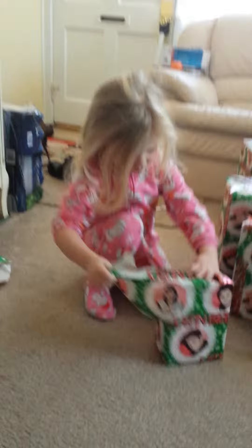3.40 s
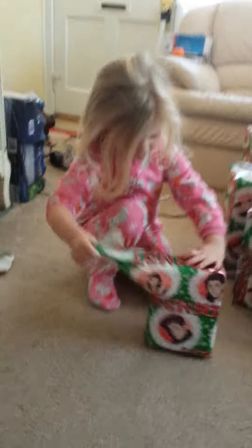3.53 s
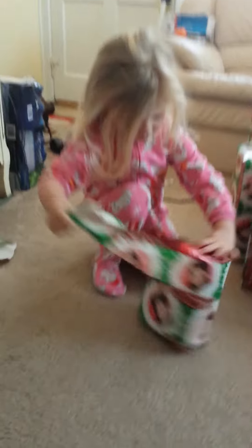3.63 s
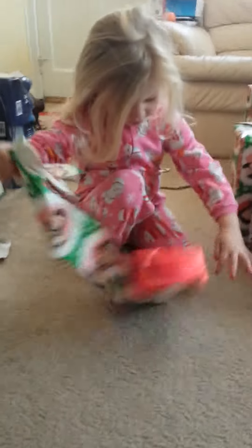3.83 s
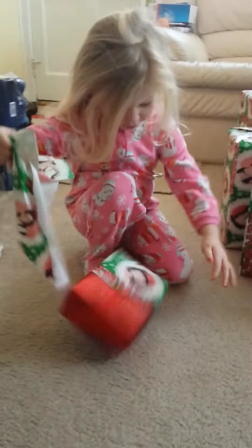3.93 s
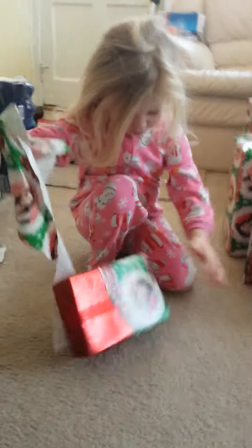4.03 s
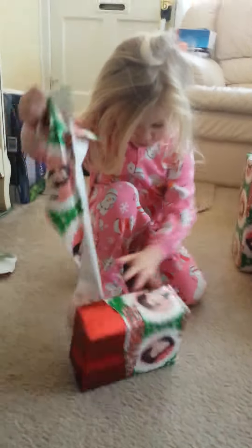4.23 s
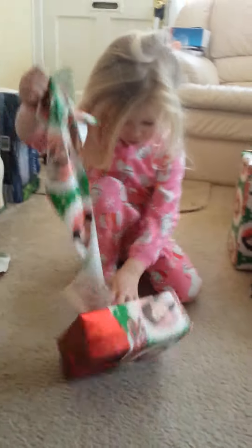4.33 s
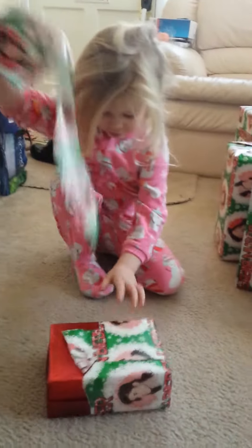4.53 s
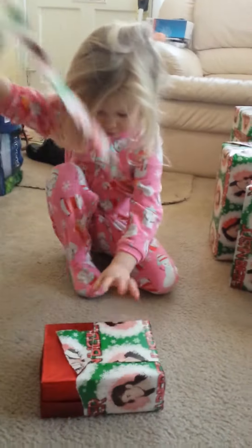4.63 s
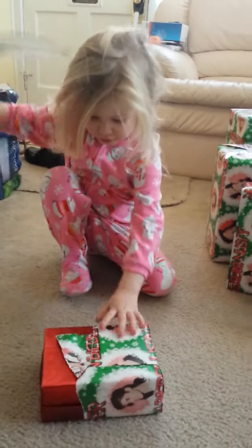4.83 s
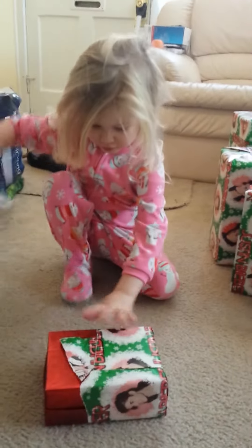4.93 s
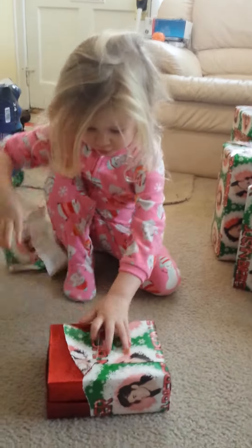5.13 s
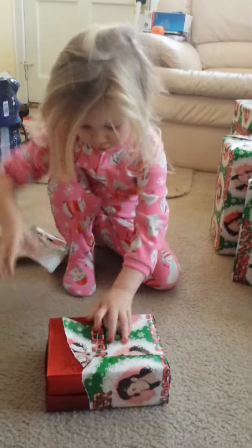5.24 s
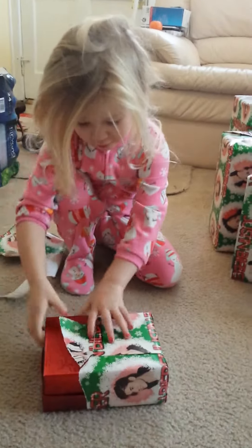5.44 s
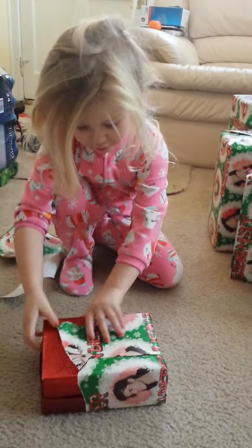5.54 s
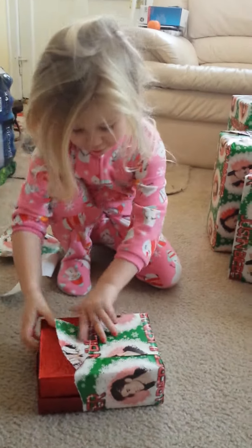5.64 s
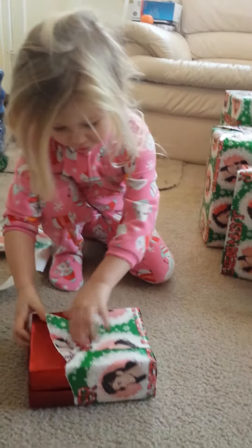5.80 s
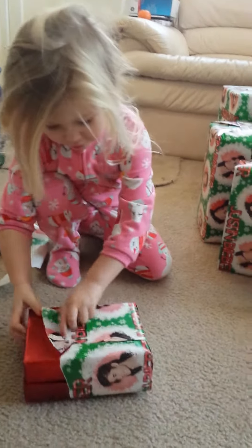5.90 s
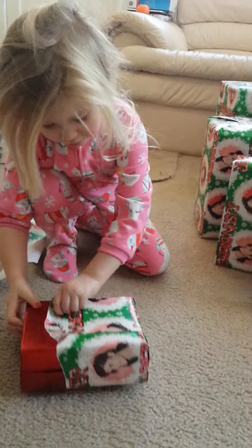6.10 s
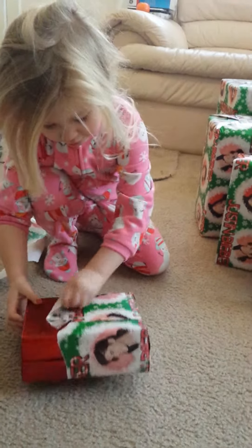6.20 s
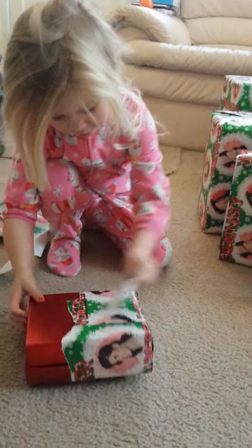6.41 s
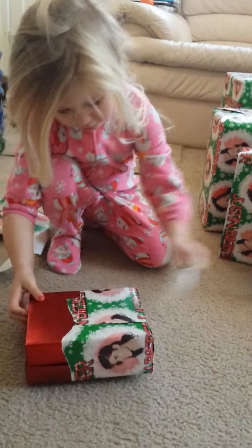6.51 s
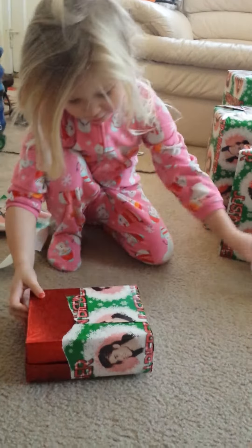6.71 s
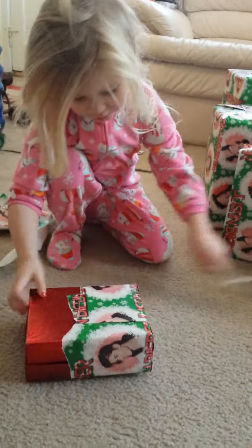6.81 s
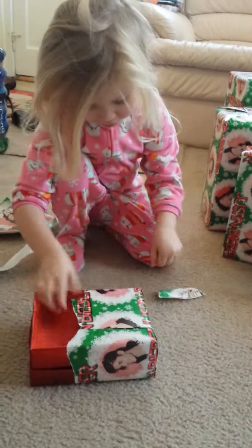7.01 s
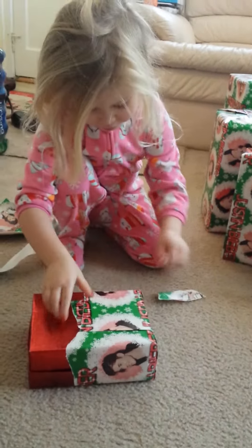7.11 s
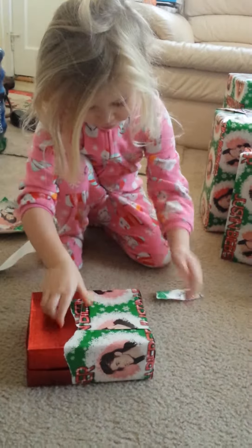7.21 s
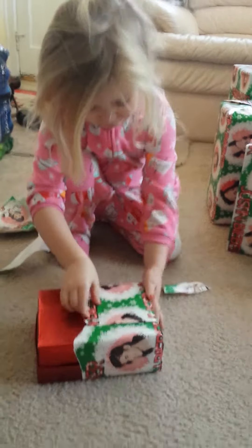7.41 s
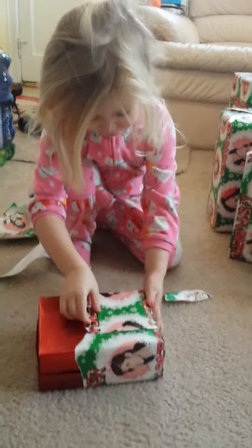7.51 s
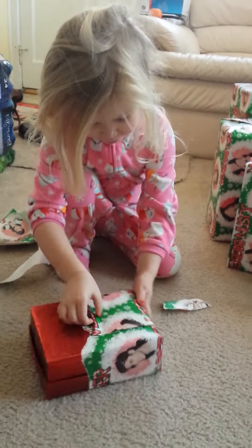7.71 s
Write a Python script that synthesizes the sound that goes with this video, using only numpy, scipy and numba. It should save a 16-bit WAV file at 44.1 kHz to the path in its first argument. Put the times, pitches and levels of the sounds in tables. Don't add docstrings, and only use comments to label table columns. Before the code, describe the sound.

Gift wrap is pulled from a hollow cardboard box on carpet. Dry crackling leads into two strong stretches of uneven ripping, separated by quieter rustling. A low microphone bump lands during the second. After another short rip come soft thuds, finger taps and thin crinkles, a brief lighter tear, then near quiet. Stereo phone sound, close and bright, with short room reverberation, light hiss and faint hum.

```python
import sys
import numpy as np
from scipy import signal
from scipy.fft import rfft, irfft
from scipy.io import wavfile
from scipy.ndimage import uniform_filter1d
from numba import njit

SR = 44100
rng = np.random.default_rng(int(sys.argv[2]) if len(sys.argv) > 2 else 0)


def voltage_ratio(level):
    return 10 ** (np.asarray(level, float) / 20)


def inscribe(sig):
    pcm = np.round(np.clip(np.atleast_2d(sig).T, -1, 1) * 32767)
    wavfile.write(sys.argv[1], SR, pcm.astype(np.int16))


N = 342216

# [start t/s, length t/s, level/dB, change over the pull level/dB]
RIPS = [(0.715, 0.2, -29, -11.5), (0.906, 0.13, -35.5, 0.5), (1.054, 0.21, -30.5, 4),
        (1.287, 0.016, -36.5, 8), (1.327, 0.032, -35, 9.5), (1.37, 0.03, -22, -7.5),
        (1.4, 0.016, -17, -10.5), (1.408, 0.068, -30.5, 13), (1.482, 0.18, -14.5, -5),
        (1.865, 0.015, -25.5, -5.5), (1.88, 0.016, -29.5, 13.5), (1.908, 0.13, -27.5, 6.5),
        (2.027, 0.031, -36, 5.5), (2.062, 0.075, -21, -2), (3.051, 0.054, -30.5, -24.5),
        (3.108, 0.017, -35.5, 6), (3.132, 0.062, -32, 7.5), (3.197, 0.031, -20, 5),
        (3.227, 0.17, -19.5, -9), (3.408, 0.012, -16, -6), (3.423, 0.033, -22, 3), (3.469, 0.1, -18, -32.5),
        (3.531, 0.063, -36.5, 9.5), (3.595, 0.023, -27.5, 7), (3.633, 0.11, -17, -17),
        (3.753, 0.043, -27, 4), (3.796, 0.0305, -24.5, 2), (3.822, 0.031, -17.5, 2),
        (3.909, 0.061, -20, 2.5), (4.28, 0.022, -25.5, -11), (4.304, .13, -21.5, -6),
        (4.443, 0.12, -15.5, -7), (5.138, 0.077, -53, 14.5), (6.175, 0.084, -37, -7),
        (6.207, 0.074, -32, -14), (6.285, 0.176, -28, 6.5)]
GRIP_S, LET_GO_DB_PER_S = 0.008, 1795
# [middle t/s, half length t/s, level/dB]
RUSTLES = [(0.03, 0.11, -48.5), (0.234, 0.091, -45), (.38, 0.21, -51.5), (0.522, 0.02, -39.5),
           (0.723, 0.24, -41.5), (1.766, 0.26, -42), (2.19, 0.044, -45), (2.358, 0.08, -46.5),
           (2.477, 0.053, -42), (2.693, 0.17, -52.5), (2.963, 0.12, -46.5), (2.975, 0.016, -40),
           (4.03, 0.096, -42), (4.141, 0.0026, -27.5), (4.193, 0.51, -51), (4.913, 0.12, -51),
           (5.042, 0.1, -44), (5.238, 0.066, -45.5), (5.473, 0.17, -50.5), (5.876, 0.12, -60.5),
           (5.652, 0.072, -49.5), (5.98, 0.035, -47), (6.148, 0.049, -44.5), (6.793, 0.019, -55.5),
           (6.933, 0.046, -54), (7.144, 0.0092, -54), (7.196, 0.02, -60.5), (4.583, 0.058, -36),
           (7.499, 0.024, -40.5), (7.59, 0.018, -65), (7.73, 0.091, -46)]
# [t/s, slackness level/dB, contact with the box level/dB, left-right level/dB]
SHEET = [(0, -14, -10, 6), (.7, -9, -9.5, 8), (1.2, -2.5, -12, 7.5), (1.57, -5, -19.5, 6.5),
         (2.0, -6.5, -15, 8.5), (2.6, -9, -3, 10), (3.25, -6.5, -13, 8.5), (3.45, -8.5, -14, 6.5),
         (3.7, -11, -13, 9.5), (3.85, -9.5, -20.5, 5), (4.35, -7, -18.5, 10), (4.55, -13, -16.5, 4.5),
         (5.1, -8, -12.5, 7.5), (6.0, -12, 0.5, 5), (6.26, -14, -15, 12), (6.42, -13.5, -10, 5.5),
         (7.4, -12, 0.5, 11.5), (7.76, -13, -11, 4)]

# [f/Hz, level/dB per Hz]
FIBRE = [(880, -57.5), (1500, -10.5), (1620, -11), (3030, -9.5), (5090, -4), (5560, -3.5), (6630, 0),
         (7910, -1.5), (13900, -13), (14900, -31), (15500, -51)]
# [f/Hz, level/dB per Hz]
FLEX = [(300, -24), (600, -3), (1000, 4), (1500, 3), (2500, 5.5), (4500, -5.5)]
# [f/Hz, level/dB per Hz]
DRUM = [(90, -23), (190, 3), (300, -10), (440, -4), (600, -9), (1000, -18.5)]
SLIDE_DB, CRINKLE_DB = 1.5, -8
FLEX_PER_DB, DRUM_PER_DB, EFFORT_DB = -0.42, -0.2041, -31
STILL_DB = -51
RUN_DB, RUN_SHARE = -25.5, 0.44
SLACK_HZ, SLACK_SHARE, SLACK_DB = 4000, 0.13, -9
PATCHY_DB = 2.5

# [t/s, peak level/dB, centre f/Hz]
POPS = [(0.139, -20, 8140), (0.2732, -21, 6470), (0.5616, -12, 5160), (0.7135, 1, 2100),
        (0.748, -20, 6700), (0.7761, -26, 6910), (0.7956, -29, 6190), (0.84, -22, 4750),
        (0.8525, -10, 8000), (0.904, -18, 5980), (0.9203, -7.5, 4230), (0.9193, -23, 5660),
        (0.9729, -2.5, 6600), (1.051, -6, 6360), (1.059, -12, 6260), (1.0848, -4, 6610),
        (1.118, -6.5, 4230), (1.124, -16, 5560), (1.176, -13, 6770), (1.189, -14.5, 5070),
        (1.209, -3.5, 5400), (1.242, -3.5, 6290), (1.287, -25, 6330), (1.2955, -30, 6340),
        (1.3385, -27, 8900), (1.341, -11, 4760), (1.37, -6.5, 8180), (1.402, -2.5, 8700),
        (1.438, -25.5, 6400), (1.4567, -11, 5910),
        (1.7597, -19, 6100), (1.8415, -20, 6620), (1.866, -6, 8200), (1.8935, -1, 6890),
               (2.0605, -0.5, 6380), (2.1807, -17, 7260), (2.2167, -21.5, 6520), (2.3, -28, 6870),
               (2.3254, -24.5, 3650), (2.5748, -28.5, 6410), (2.7415, -25.5, 3900), (2.7659, -25, 6530),
               (2.9704, -17, 5860), (3.0557, -21, 6600), (3.1166, -28, 6630), (3.1435, -25, 6640),
               (3.184, -26, 6660), (3.184, -2, 6680), (3.4089, -9, 8000), (3.4324, -28.5, 7090),
               (3.4753, -4, 7000), (3.5541, -6, 7200), (3.604, 1, 5090), (3.6324, 0, 6500),
               (3.6893, -22, 8060),
        (3.6894, 3, 8000), (3.755, -10, 5920), (3.767, -16, 8910), (3.802, -0.5, 8000),
              (3.831, 1, 6340), (3.9116, -3, 6500), (4.0505, -15, 4020), (4.102, -32, 3740),
              (4.1425, -29.5, 6640), (4.2433, -27.5, 6060), (4.2835, -20, 5200), (4.306, -9, 4830),
              (4.388, -7, 6550), (4.447, -21, 6300), (4.8968, -33, 2770), (4.8956, -21.5, 5170),
              (4.9806, -27, 6580), (5.0046, -13.5, 6660), (5.0518, -33, 6690), (5.0622, -24.5, 4800),
              (5.0795, -16, 6540), (5.15, -31, 9650), (5.1524, -10.5, 10800), (5.174, -23, 10300),
              (5.1944, -25, 6750), (5.952, -47, 6050),
        (6.0536, -19, 6500), (6.093, -20, 7800), (6.146, -39, 8650), (6.147, -14, 8650),
             (6.1761, -5, 7100), (6.2104, -12, 6630), (6.2198, -19, 7310), (6.239, -16, 6940),
             (6.2584, -5, 6730), (6.2734, -4.5, 7450), (6.298, -5, 6750), (6.314, -12, 6800),
             (6.339, -6.5, 6690), (6.362, -6, 7610), (6.3865, -1, 7330), (6.7208, -34.5, 2070),
             (6.8618, -36.5, 4430), (6.957, -33, 7100), (7.1387, -42, 8300), (7.4345, -45, 6350),
             (7.467, -39, 6200), (7.466, -30, 6300), (7.483, -24, 6320), (7.5131, -21.5, 6300),
             (7.6211, -24.5, 6940), (7.667, -23, 9050), (7.709, -21.5, 7000)]
# [t/s, peak level/dB, centre f/Hz]
TICKS = [(0.0763, -32, 7100), (0.08, -24.5, 6300), (0.1472, -27, 8400), (0.1538, -28, 7800),
         (0.1759, -30, 7600), (0.2329, -29, 5900), (0.375, -28.5, 4380), (0.4276, -34, 6900),
         (0.4472, -35, 6000), (0.4996, -28, 7100), (0.6504, -23, 2980), (0.6763, -21, 8300),
         (0.69, -20, 4300), (0.767, -28, 8700), (0.776, -25, 5800), (0.915, -27, 7200),
         (0.999, -9, 5900), (1.0347, -17, 6300), (1.1272, -2.5, 4100), (1.1764, -23, 6600),
         (1.19, -10, 8200), (1.2003, -6, 7900), (1.215, -6, 9000), (1.2746, -16, 6500),
         (1.288, -16, 6500), (1.2973, -22, 6400), (1.3228, -20, 5500), (1.3471, -23, 5200),
         (1.377, -16, 8500), (1.7675, -18.5, 5100), (1.8235, -22, 4900), (1.857, -10, 9200),
         (1.9163, -4, 7100), (2.1887, -17, 6900), (2.3224, -33, 6300), (2.3635, -26, 5900),
         (2.3972, -34, 7400), (2.9024, -30, 9500), (2.977, -25, 6300), (3.0068, -28, 6300),
         (3.0558, -20, 6600), (3.1102, -27, 3720), (3.2921, -7, 6300), (3.337, -6, 7500),
         (3.3658, -4, 7640), (3.3695, -4, 6300), (3.394, -14, 7800), (3.4392, 1.5, 7100),
         (3.5187, -13, 6200), (3.5432, -16, 7500),
         (3.559, -10, 9200), (3.5687, -11, 6500), (3.6713, 3.5, 6200), (3.7081, -0.5, 6450),
              (3.7148, -6, 5200), (3.771, -4.5, 4570), (3.7876, -9, 8700), (3.814, -9.5, 5900),
              (3.8517, -11, 6700), (3.8835, -9, 5900), (3.9004, -14, 8400), (3.9619, -3, 6900),
              (3.9894, -15, 7100), (3.999, -13, 9400), (4.102, -44, 6100), (4.2871, -14, 7200),
              (4.2915, -27, 5800), (4.307, -23, 6800), (4.3311, -2.5, 4900), (4.3805, -4.5, 6800),
              (4.7345, -34, 5870), (4.8869, -32, 7500), (4.9199, -35, 8200), (4.9772, -29, 7000),
              (5.022, -24, 6630), (5.0996, -33, 7000), (5.1427, -19, 10900), (5.166, -22, 9600),
              (5.1713, -26, 10300), (5.1964, -25, 9600), (5.3546, -32, 6800), (5.515, -30, 6500),
              (5.9164, -38, 6800), (6.0699, -29, 6900), (6.0739, -34, 10200), (6.09, -15, 7200),
              (6.1605, -37, 7300), (6.221, -12, 6500), (6.2247, -11, 4000), (6.3008, -21, 6700),
              (6.355, -2.5, 6600), (6.4774, -8, 7300), (6.7155, -49, 6250), (6.87, -34.5, 4000),
              (7.0645, -61, 5500), (7.1936, -36, 1820), (7.3419, -39.5, 7500), (7.3809, -48, 6860),
              (7.5814, -42, 8000), (7.5851, -39, 6700), (7.6366, -27, 6200),
         (0.7114, -5, 7500), (3.1182, -14, 4970), (4.4447, -8, 5500), (0.5624, -31, 8000),
              (0.762, -13, 2940), (1.167, -5, 1900), (1.4045, -8, 8500), (1.4695, -14.5, 9000),
              (0.819, -27, 6000), (1.338, -12, 5500), (1.486, -4, 8500), (1.547, -2, 5300),
              (1.872, -8, 8100), (1.982, -5.5, 8000), (3.1425, -8.5, 8000), (5.185, -29, 10500),
              (5.208, -18.5, 4200), (6.192, -14, 7000), (6.2407, -4.5, 2880), (6.2505, -11, 7000),
              (6.466, -4, 9000),
         (1.4895, -3, 8000), (1.5005, -9, 8500), (1.513, 4.5, 6500), (1.6444, -3.5, 7800),
              (1.9652, -5, 8200), (2.0201, -12, 9200), (2.0362, -22, 4950), (3.0691, -40, 6600),
              (3.2535, -10, 3900), (3.2875, -10.5, 6800), (3.311, -2, 6800), (3.3457, -7, 7000),
              (3.412, -6, 6700), (3.6548, 4, 6200), (3.7216, -9, 5900), (3.796, -9.5, 8200),
              (3.837, -6, 9000), (3.9166, -0.5, 9800), (3.9335, -3, 6200), (4.0535, -31, 8100),
              (4.3132, -15, 4800), (4.458, -4, 6500), (4.5464, -5.5, 6500), (6.2257, -15, 7200),
              (6.2375, -15, 6600), (6.27, -8, 6500), (6.3741, -8, 4600), (6.4396, -5, 7700)]
POP_DB, SHIVER_DB = -1.5, -21

# [t/s, peak level/dB, pitch f/Hz, t60 t/s]
KNOCKS = [(0.71, -30, 326, 0.025), (4.603, -28.5, 70.5, 0.029), (4.63, -36, 63.6, 0.072),
          (4.734, -41.5, 151, 0.023), (5.149, -33.5, 414, 0.04), (5.302, -45, 504, 0.041),
          (5.326, -46, 300, 0.12), (5.355, -42, 400, 0.026), (5.515, -38.5, 190, 0.093),
          (5.572, -35.5, 312, 0.06), (5.584, -38, 298, 0.066), (5.968, -34, 285, 0.047),
          (6.18, -29.5, 285, 0.017), (7.129, -41, 288, 0.042), (7.138, -35, 307, 0.058),
          (7.2, -51, 398, 0.05), (7.491, -34, 274, 0.036), (7.62, -41, 265, 0.051)]
# [t/s, peak level/dB, cavity f/Hz, damping as decay rate over angular frequency]
BUMP = (3.6284, 6.9, 62, 1.3)
# [f/Hz, left-right level/dB]
PORTS = [(100, 3), (400, -2), (1500, -2.5), (3300, 0), (5500, 2.5), (7200, 3), (9000, -10.5), (14000, -4.5)]
# [f/Hz, left lead/radians]
LEAD = [(0, 0), (1810, 1), (4820, -0.63), (5340, 1.52), (8100, 0.0), (9910, 5), (15200, 0.5)]
# [f/Hz, likeness -1 to 1]
SAME = [(60, 1), (240, 0.57), (950, 0.96), (3770, 0.18), (15000, 0.19)]

# [f/Hz, t60 t/s]
ROOM = [(150, 0.33), (1000, 0.43), (4000, 0.29), (12000, 0.18)]
# [f/Hz, level/dB per Hz]
AIR = [(15, -16), (25, -17), (43, -11), (140, -10), (199, -10.5), (297, -12.5), (340, -15.5), (1340, -27.5),
       (2930, -32.5), (6390, -27.5), (13900, -30.5), (15500, -72)]
AIR_DB = -55.5
# [f/Hz, likeness -1 to 1]
AIR_SAME = [(60, 0.7), (240, 0.86), (950, 0.13), (3770, 0.055), (15000, 0.019)]
# [f/Hz, rms level/dB]
HUM = [(86.1, -65.5), (118.4, -62.5), (145.3, -61.5), (236.9, -91.5), (290.7, -61), (425.3, -74)]


def tearing():
    s, *columns = np.transpose(SHEET)
    slack_db, drum_db, _ = (np.interp(np.arange(N) / SR, s, c) for c in columns)
    torn, loose = pull(), shifting()
    effort = np.sqrt(torn ** 2 + loose ** 2 + 1e-9)
    over = effort / voltage_ratio(EFFORT_DB)

    fibres = swarm(1500, 3.0, 0.5, 0.0004, 3000, 13000, FIBRE)
    flex = patchy(swarm(550, 1.7, 0.8, 0.0026, 595, 3320, FLEX))
    drum = swarm(300, 0.84, 0.49, 0.0068, 260, 515, DRUM).mean(0)
    slide = patchy(colour(pair(*rng.standard_normal((2, N)), SAME), lambda f: read(FIBRE, f)))

    low = voltage_ratio(slack_db) * over ** FLEX_PER_DB * flex
    low = low + voltage_ratio(drum_db) * over ** DRUM_PER_DB * drum
    run = RUN_SHARE * torn ** 2 / (torn ** 2 + voltage_ratio(RUN_DB) ** 2)
    high = (torn * np.sqrt(1 - run) + voltage_ratio(CRINKLE_DB) * loose) * fibres
    high = high + (torn * np.sqrt(2 * run) + voltage_ratio(SLIDE_DB - 3.5) * loose) * slide
    high = high + creases()
    dull = signal.lfilter(*signal.butter(2, SLACK_HZ, fs=SR), high)
    high = high + (voltage_ratio(SLACK_SHARE * (slack_db - SLACK_DB)) - 1) * dull
    return voltage_ratio(-1.5) * (high + effort ** 2 / (effort + voltage_ratio(STILL_DB)) * low)


def pull():
    age, power = np.arange(SR // 2) / SR, np.zeros(N)
    for s, length, db, change_db in RIPS:
        shape_db = change_db * np.minimum(age / length, 1)
        shape_db = shape_db - LET_GO_DB_PER_S * np.maximum(age - length, 0)
        add(power, s, np.minimum(age / GRIP_S, 1) * voltage_ratio(db + shape_db) ** 2)
    return np.sqrt(power)


def shifting():
    t = np.arange(N) / SR
    return np.sqrt(sum(voltage_ratio(db) ** 2 * np.exp(-((t - s) / half) ** 2) for s, half, db in RUSTLES))


def creases():
    def body(f):
        return 0.78 * read(FIBRE, np.maximum(f, 1600)) - 12.0 * np.log2(1 + 900 / (f + 1))

    out = np.zeros((2, N))
    pops = POPS
    ticks = TICKS
    for s, db, hz in pops + ticks:
        pop = snap(hz, 0.00028, 6 - 0.6 * body(hz), body, 3.5, size=1024)
        pop = pop / abs(pop.mean(0)).max()
        shiver = snap(hz, 0.004, 3 - 0.4 * body(hz), body, 0, size=1024)
        add(out, s + 0.001, voltage_ratio(db + POP_DB) * (pop + voltage_ratio(SHIVER_DB) * shiver))
    return out


def swarm(per_s, spread_db, clump, decay_s, low_hz, high_hz, body, count=60):
    rate = per_s * np.exp(clump * drift(0.004))
    chance, big, which = rng.random((N, 3)).T
    at = np.flatnonzero(chance < rate / SR)
    size = voltage_ratio(spread_db * np.minimum(-np.log(big[at] + 1e-9), 4))
    patch = (which[at] * count).astype(int)
    centres = np.geomspace(low_hz, high_hz, count)
    shapes = np.array([snap(hz, decay_s, 12.2, lambda f: read(body, f), 0.43) for hz in centres])
    out = scatter(at, size, patch, shapes, N)
    return out / np.sqrt(abs(uniform_filter1d(out.mean(0) ** 2, 3000)) + 1e-3)


def snap(hz, decay_s, bump_db, body, crack, size=512):
    t = np.arange(size) / SR
    a, b = rng.standard_normal((2, size)) * np.exp(-t / decay_s)
    burst = pair(a, b, SAME)
    burst[:, :3] += crack * rng.standard_normal(3)
    return evened(colour(burst, lambda f: body(f) + bump_db * np.exp(-(np.log2((f + 1) / hz) / 0.62) ** 2)))


@njit
def scatter(at, size, patch, shapes, length):
    out = np.zeros((2, length + shapes.shape[2]))
    for i in range(len(at)):
        out[:, at[i]:at[i] + shapes.shape[2]] += size[i] * shapes[patch[i]]
    return out[:, :length]


def patchy(x):
    hz, t, z = signal.stft(x, SR, nperseg=256)
    field = rng.standard_normal((len(t), len(hz)))
    field = uniform_filter1d(field, size=7, axis=0)
    field = evened(uniform_filter1d(field, size=9, axis=1)).T
    return evened(signal.istft(z * voltage_ratio(PATCHY_DB * field), SR, nperseg=256)[1][:, :N])


def box():
    def dull_db(f):
        return -9.0 * np.log2((1 + (f / 560) ** 2) * (1 + (110 / (f + 5)) ** 2))

    out, t = np.zeros(N), np.arange(SR // 5) / SR
    for s, db, hz, t60 in KNOCKS:
        ring = voltage_ratio(-60 * t / t60) * np.sin(2 * np.pi * hz * t)
        thud = evened(colour(rng.standard_normal(len(t)), dull_db)) * voltage_ratio(-60 * t / 0.066)
        onset = 1 - np.exp(-t / 0.0081)
        add(out, s, voltage_ratio(db + 10.0) * (ring + 0.5 * thud) * onset)
    return out


def handling():
    out, t = np.zeros((2, N)), np.arange(SR // 10) / SR
    s, db, hz, damping = BUMP
    step = np.exp(-2 * np.pi * hz * damping * t) * np.cos(2 * np.pi * hz * t + 0.85)
    add(out[1], s, voltage_ratio(db) * step)
    gust = evened(colour(rng.standard_normal(len(t)), lambda f: -12.0 * np.log2(1 + f / 60), size=4096))
    gust = gust * voltage_ratio(-60 * t / 0.19) * signal.windows.tukey(len(t), 0.3)
    add(out[1], 4.603, voltage_ratio(-39) * gust)
    return out


def room(x):
    taps = np.zeros((2, SR // 2))
    at = np.arange(160, SR // 2 - 20, 20)
    at = at + rng.integers(0, 20, (2, len(at)))
    np.put_along_axis(taps, at, rng.choice([-1., 1.], at.shape), 1)
    hz, t, z = signal.stft(taps, SR, nperseg=256)
    tail = signal.istft(z * voltage_ratio(-60 * t / read(ROOM, hz)[:, None]), SR, nperseg=256)[1]
    return signal.fftconvolve(x, tail / np.linalg.norm(tail[0]), axes=1)[:, :N]


def room_tone():
    noise = pair(*rng.standard_normal((2, N)), AIR_SAME)
    hiss = evened(colour(noise, lambda f: read(AIR, f), size=4096))
    t, hum = np.arange(N) / SR, np.zeros(N)
    for hz, db in HUM:
        level = np.sqrt(2) * voltage_ratio(db + 2.47 * drift(0.064))
        hum += level * np.sin(2 * np.pi * hz * t + 0.73 * drift(0.14))
    sway_db = 1.2 * drift(0.05)
    return voltage_ratio(AIR_DB + sway_db) * hiss + hum * voltage_ratio(np.array([[1.2], [-1.2]]))


def evened(x):
    return x / np.sqrt(np.mean(x ** 2) + 1e-20)


def read(points, hz):
    f, value = np.transpose(points)
    return np.interp(np.log(hz + 1), np.log(f + 1), value)


def add(mix, s, sound):
    part = mix[..., round(s * SR):][..., :sound.shape[-1]]
    part += sound[..., :part.shape[-1]]


def colour(x, gain_db, size=1024):
    hz = abs(np.fft.fftfreq(size, 1 / SR))
    log_gain = np.log(voltage_ratio(np.maximum(gain_db(hz), -100)))
    taps = np.fft.ifft(np.exp(np.conj(signal.hilbert(log_gain)))).real
    taps = taps.reshape((1,) * (x.ndim - 1) + (-1,))
    return signal.oaconvolve(x, taps, axes=-1)[..., :x.shape[-1]]


def pair(a, b, likeness):
    same = np.clip(read(likeness, np.fft.rfftfreq(len(a), 1 / SR)), -1, 1)
    other = same * rfft(a) + np.sqrt(1 - same ** 2) * rfft(b)
    return np.array([a, irfft(other, len(a))])


def drift(smooth_s, step=32):
    wide = max(round(smooth_s * SR / step), 1)
    coarse = uniform_filter1d(rng.standard_normal(N // step + 2), wide)
    coarse = evened(uniform_filter1d(coarse, wide))
    return np.interp(np.arange(N) / step, np.arange(len(coarse)), coarse)


def scene():
    s, *_, pan_db = np.transpose(SHEET)
    pan_db = np.interp(np.arange(N) / SR, s, pan_db) - 4.5
    paper = tearing() * voltage_ratio(np.array([[0.4], [-0.4]]) * pan_db)
    left = colour(paper[0], lambda f: 0.5 * read(PORTS, f))
    right = colour(paper[1], lambda f: -0.5 * read(PORTS, f))
    lead = read(LEAD, np.fft.rfftfreq(N, 1 / SR))
    turn = np.exp(0.5j * np.array([[1], [-1]]) * lead)
    near = irfft(rfft(np.array([left, right])) * turn, N) + box()
    return near + voltage_ratio(-10) * room(near) + room_tone() + handling()


def starve(x, under_db, bass_under_db, top_hz, edge_hz):
    hz, t, z = signal.stft(x, SR, nperseg=2048, noverlap=1536)
    power = uniform_filter1d((abs(z) ** 2).mean(0), size=3, axis=1)
    bands = np.repeat(uniform_filter1d(power, size=4, axis=0)[2::4], 4, axis=0)
    whole = power.mean(0)
    kept = np.ones(power.shape)
    kept[:len(bands)] = (bands > whole * voltage_ratio(-2 * under_db))[:len(hz)]
    bass = hz < 170
    kept[bass] *= bands[:bass.sum()] > whole * voltage_ratio(-2 * bass_under_db)
    kept[hz > top_hz] = 1
    lean = signal.istft(z * np.maximum(kept, 0.01), SR, nperseg=2048, noverlap=1536)[1][:, :N]

    hz, t, z = signal.stft(lean, SR, nperseg=256, noverlap=192)
    whole = (abs(z) ** 2).mean((0, 1))
    attack = whole > voltage_ratio(10.5) * np.roll(uniform_filter1d(whole, size=8), 7)
    opened = np.interp(np.arange(N) / SR, t, uniform_filter1d(1. * attack, size=3))
    highpass = signal.firwin(511, edge_hz, pass_zero=False, fs=SR)
    top = signal.oaconvolve(lean, highpass[None], "same")
    return lean - (1 - opened) * top


def band_limit(x):
    return signal.sosfilt(signal.butter(12, 15670, fs=SR, output="sos"), x)


def record(dry):
    ceiling = 0.9 * np.tanh(dry / 0.9)
    lean = starve(ceiling, under_db=11.5, bass_under_db=12, top_hz=1500, edge_hz=14650)
    return band_limit(lean)


dry = scene()
out = record(dry)
inscribe(out)
```